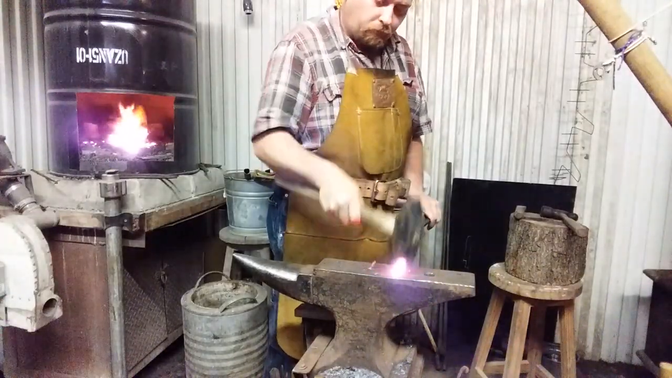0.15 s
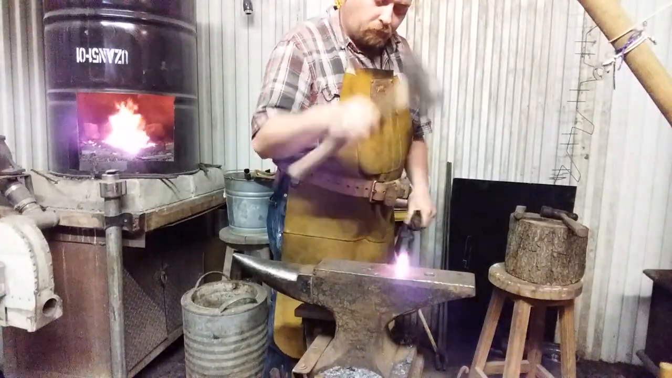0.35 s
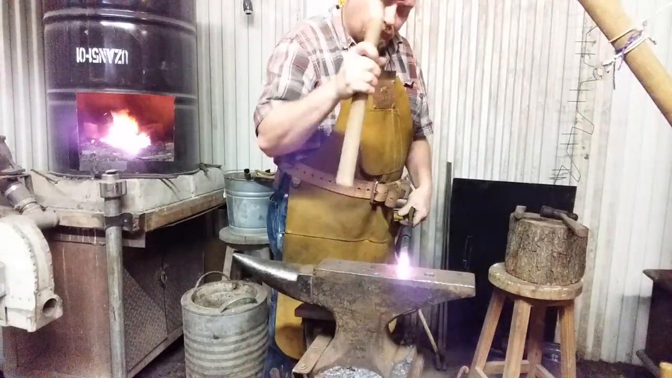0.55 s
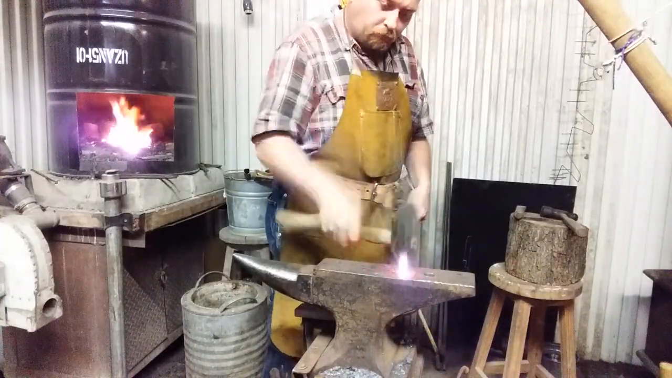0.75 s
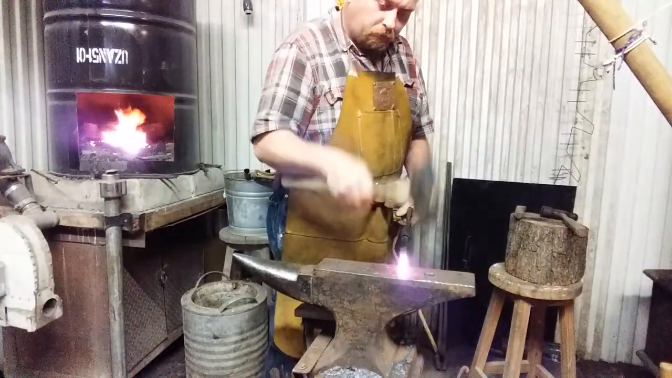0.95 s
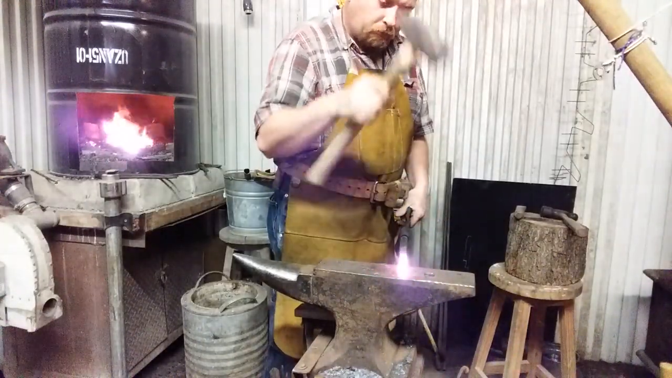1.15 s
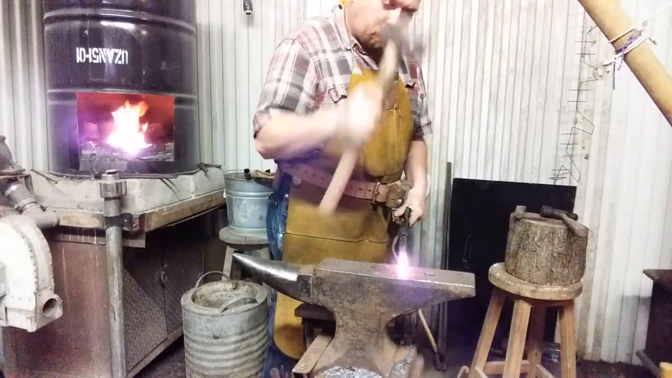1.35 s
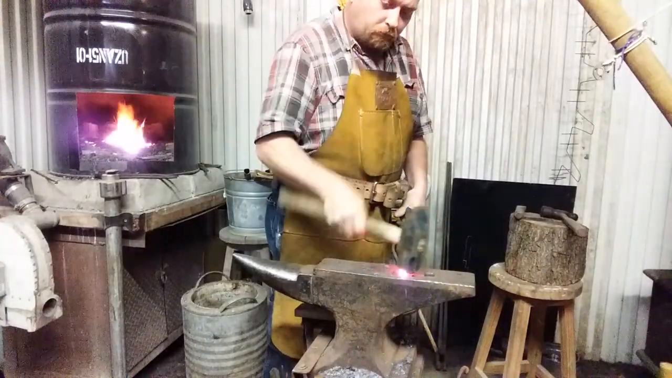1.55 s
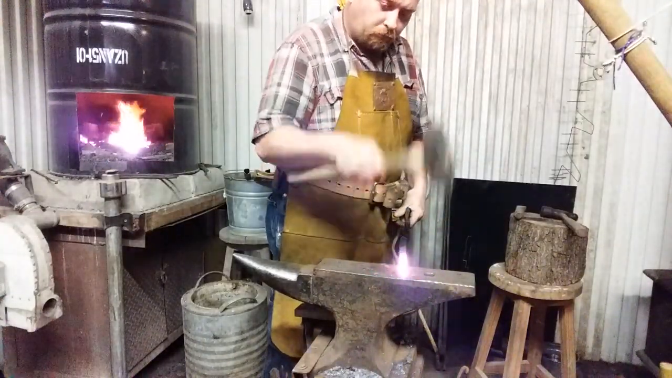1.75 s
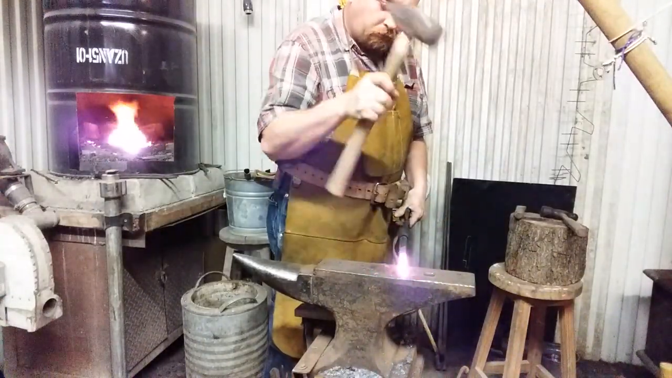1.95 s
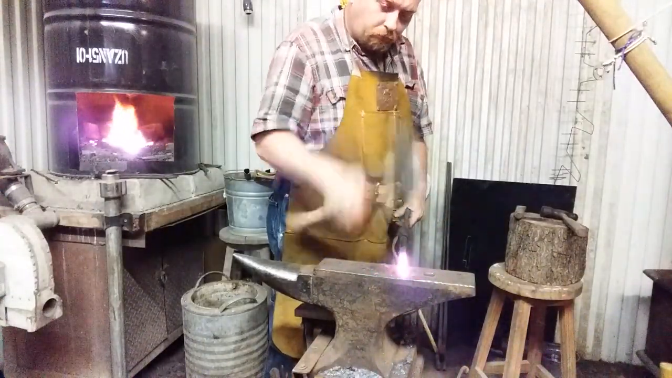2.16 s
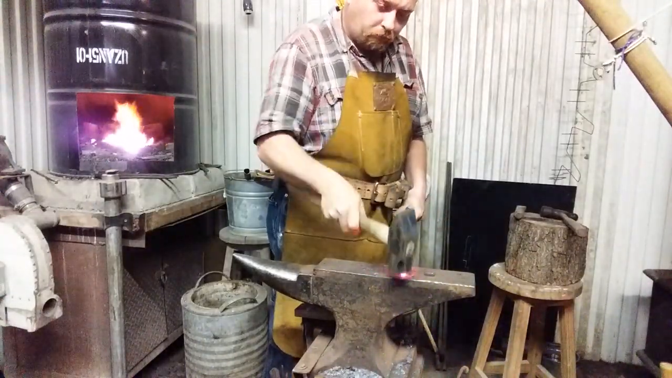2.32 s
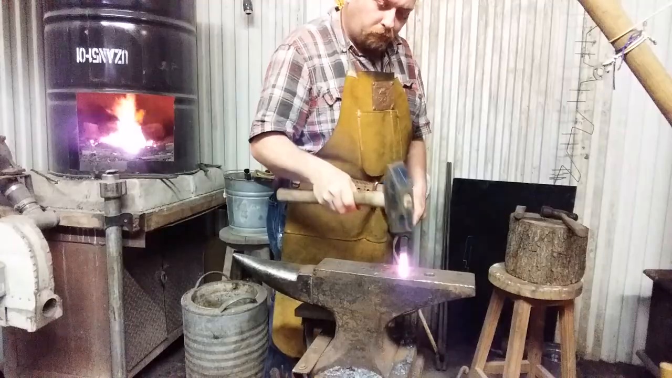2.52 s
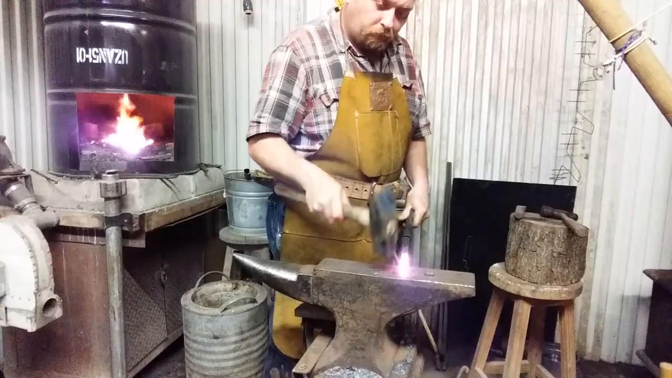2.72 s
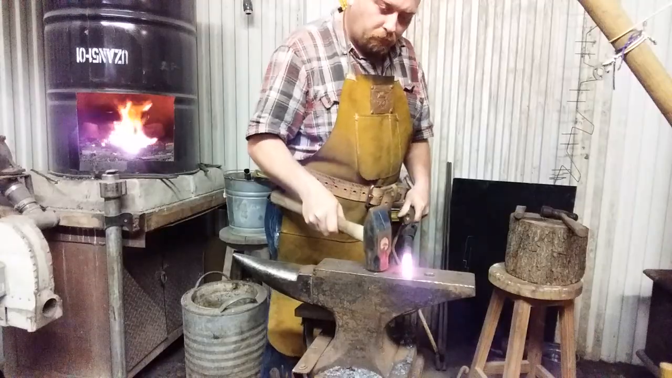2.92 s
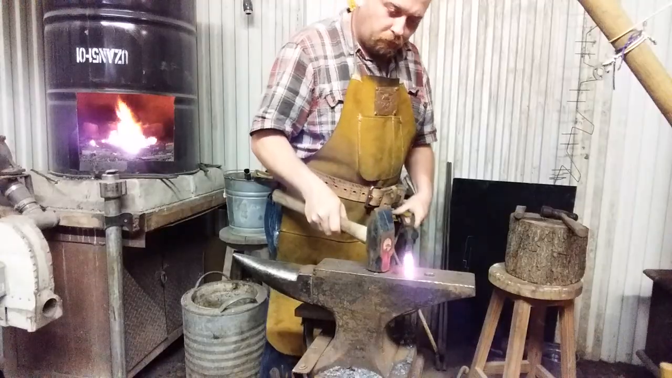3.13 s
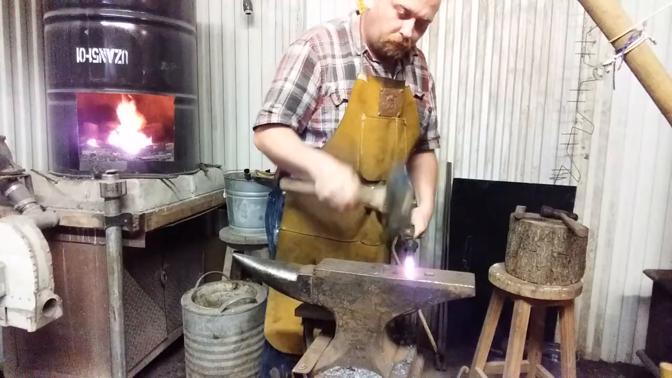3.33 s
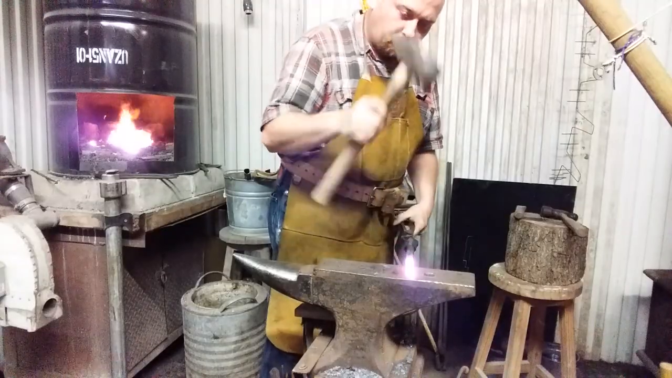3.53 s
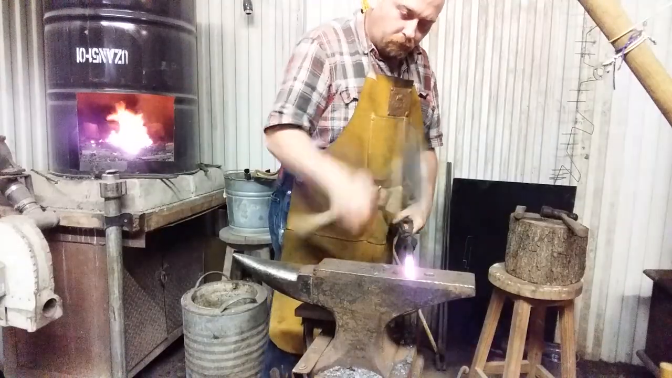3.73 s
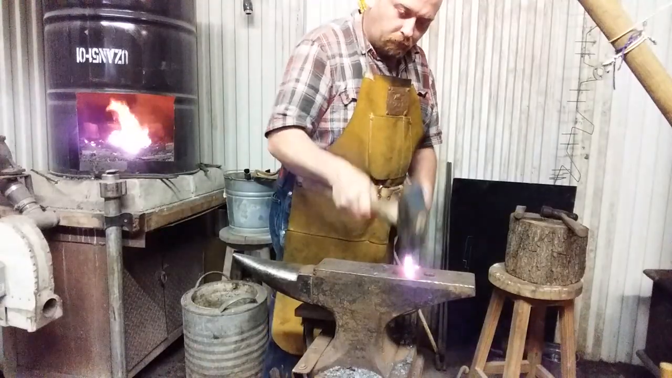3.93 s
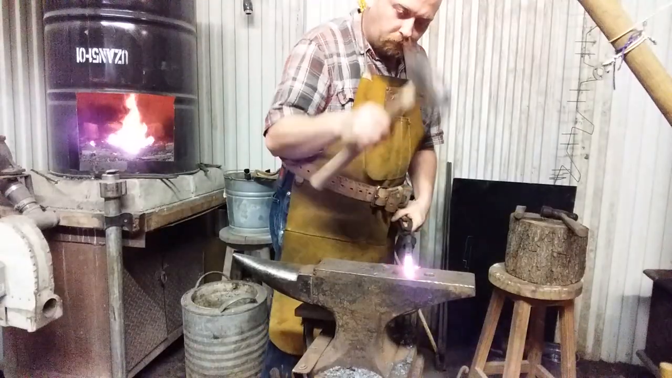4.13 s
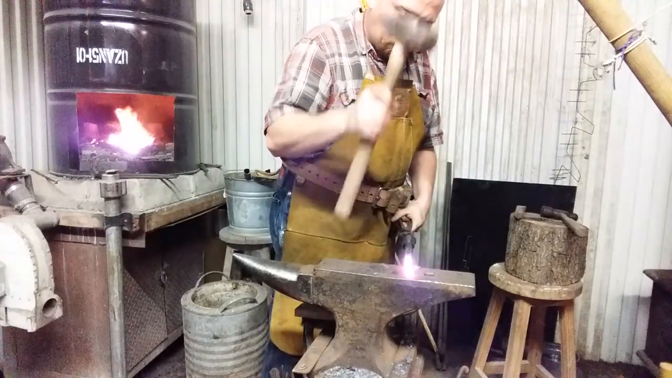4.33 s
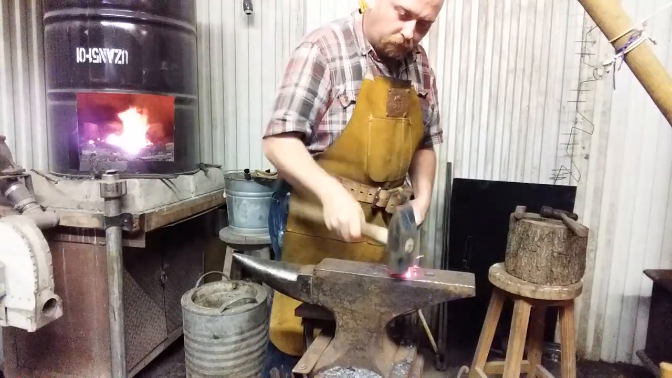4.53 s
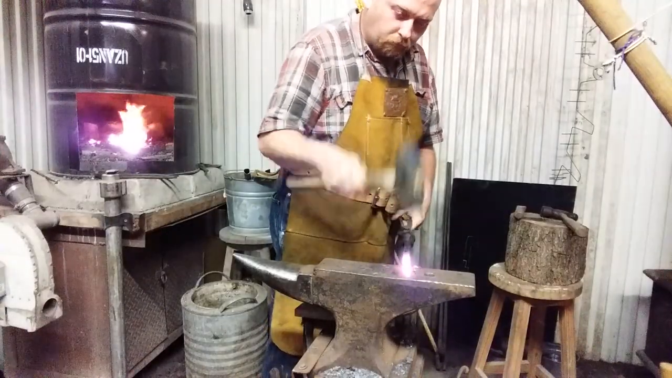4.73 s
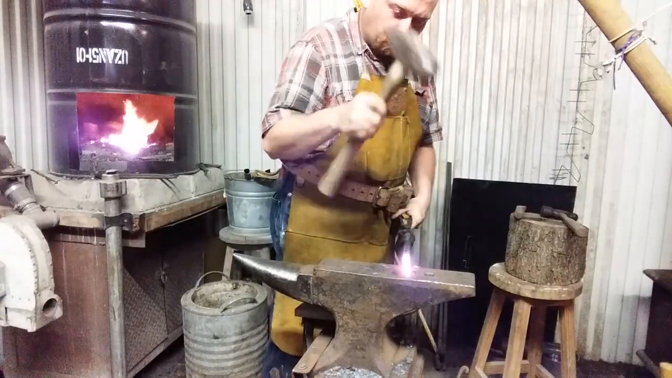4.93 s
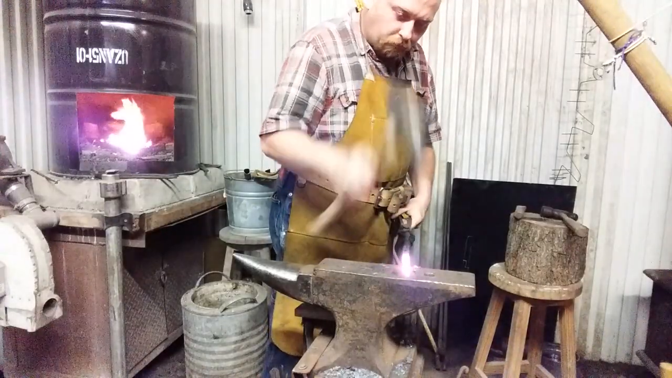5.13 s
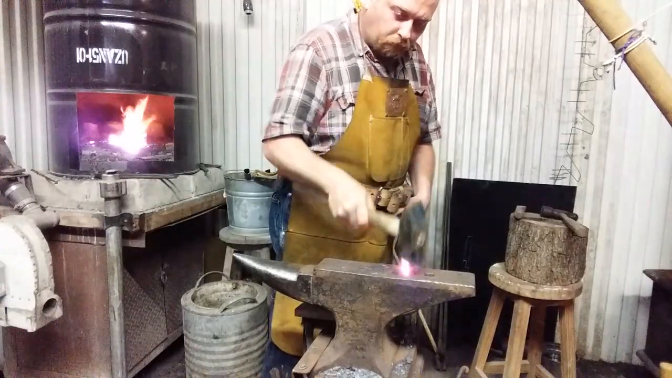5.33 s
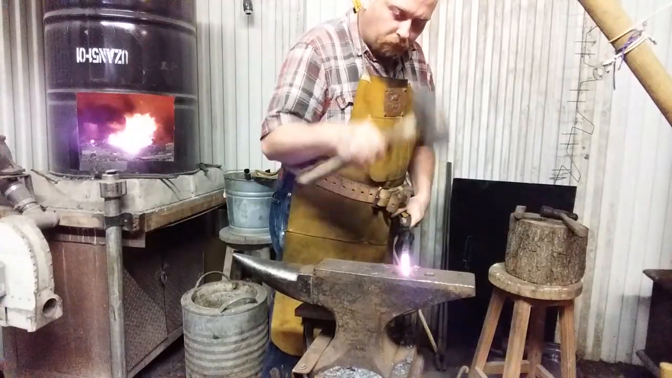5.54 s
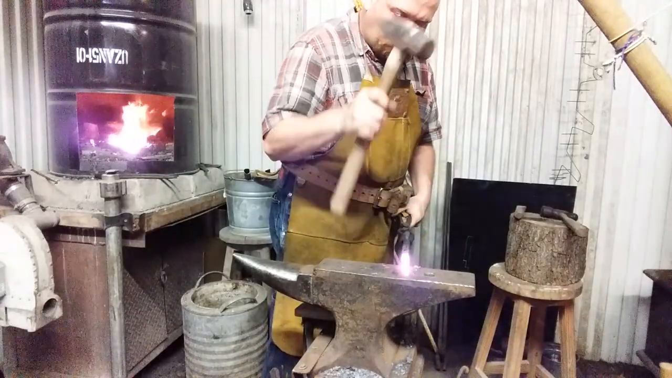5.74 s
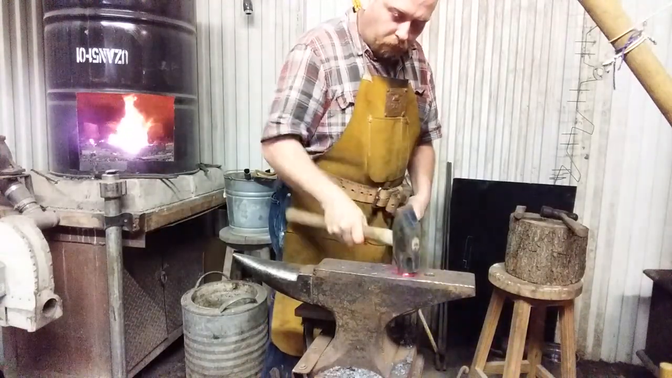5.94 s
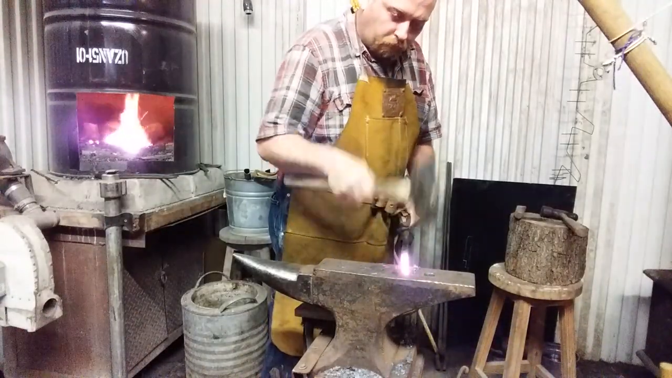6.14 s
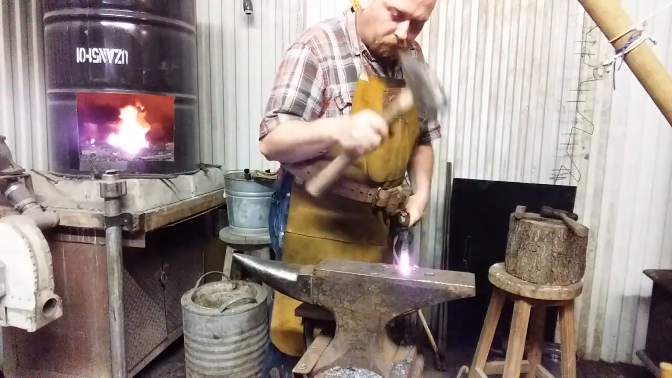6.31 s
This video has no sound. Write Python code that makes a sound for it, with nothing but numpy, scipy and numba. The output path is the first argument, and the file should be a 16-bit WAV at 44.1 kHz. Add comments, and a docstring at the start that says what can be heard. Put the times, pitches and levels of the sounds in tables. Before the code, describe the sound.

A hand hammer clanks on hot steel on an anvil in a steady rhythm, pausing once, over a low forge rumble.

```python
"""A hand hammer flattens hot steel on an anvil in a small sheet-walled forge.
Each impact excites damped modes of anvil, hammer and stand; the soft, glowing bar deadens them to
a clank that fills the shop. Halfway the smith lets the hammer drop and bounce to rest on the anvil.
The fire rumbles as broadband noise over the blower's hum, and an automatic gain control
ducks at the blows and creeps back."""
import sys
import numpy as np
from scipy import signal
from scipy.fft import rfft, irfft, next_fast_len
from scipy.io import wavfile
from scipy.ndimage import uniform_filter1d, minimum_filter1d
from numba import njit

SR = 44100
rng = np.random.default_rng(int(sys.argv[2]) if len(sys.argv) > 2 else 0)


def int16_out(signal):
    """Quantize to a 16-bit WAV file."""
    q = np.round(np.clip(np.atleast_2d(signal).T, -1, 1) * 32767)
    wavfile.write(sys.argv[1], SR, q.astype(np.int16))


N = 285327
RING = 2 * SR // 3  # samples that one blow lasts


def undb(db):
    """Amplitude ratio of a level in decibels."""
    return 10 ** (np.asarray(db) / 20)


def read(table, hz):
    """Interpolation of (frequency_hz, value) rows on a log-frequency axis."""
    frequencies, values = np.transpose(table)
    return np.interp(np.log(hz + 1e-3), np.log(frequencies), values)


def colour(x, table):
    """Minimum-phase filter with the response of (frequency_hz, gain_db) rows."""
    size = 2 * x.shape[-1]
    gain = undb(read(table, np.fft.rfftfreq(size, 1 / SR)))
    cepstrum = irfft(np.log(gain))
    cepstrum[1:size // 2] *= 2  # folding the cepstrum makes the filter causal
    cepstrum[size // 2 + 1:] = 0
    return irfft(rfft(x, size) * np.exp(rfft(cepstrum)))[..., :size // 2]


def bands(size, count, wide_hz):
    """Diffuse field as (centre_hz, width_hz, unit-rms noise); long waves reach both ears alike."""
    edges = np.geomspace(25, 17000, count + 1)
    hz = np.fft.rfftfreq(size, 1 / SR)
    mid, side = rfft(rng.standard_normal((2, size)))
    side = side * hz / np.hypot(hz, wide_hz)
    both = np.array([mid + side, mid - side])
    for lo, hi in zip(edges, edges[1:]):
        band = irfft(both * ((hz >= lo) & (hz < hi)), size)
        yield np.sqrt(lo * hi), hi - lo, band / band.std()


def walk(rate_hz):
    """Random modulation: steps smoothed twice and scaled to unit deviation."""
    span = int(SR / rate_hz)
    steps = np.repeat(rng.standard_normal(N // span + 1), span)
    smooth = uniform_filter1d(uniform_filter1d(steps, span), span)[:N]
    return smooth / smooth.std()


def fade(t60_s, hold_s=0.):
    """Exponential decay that sets in once the early reflections have passed."""
    t = np.arange(RING) / SR
    return np.exp(-np.log(1000) * (np.hypot(t, hold_s) - hold_s) / t60_s)


def add(out, start_s, sound):
    """Superposition of one impact on the mix."""
    start = int(start_s * SR)
    out[:, start:start + RING] += sound[:, :N - start]


def forge_fire(level_db=-38.5, swell_db=1.5, flutter_db=0.66):
    """Modulated broadband noise: the flames swell together and flutter band by band."""
    # noise spectrum of fire and blower: frequency_hz, relative_density_db
    spectrum = [(15, -62), (25, -31), (70, -5), (120, -3), (153, -6.5), (363, -4), (451, -11), (489, -4.5),
                (677, -10.5), (1940, -23.5), (3430, -35.5), (7310, -44), (10400, -53), (14000, -45.5),
                (16000, -61)]
    swell = swell_db * walk(1.6)
    fire = 0
    for hz, width, noise in bands(next_fast_len(N), count=36, wide_hz=600):
        flutter = flutter_db * walk(16) / np.hypot(1, hz / 2500)
        fire = fire + noise[:, :N] * np.sqrt(width) * undb(read(spectrum, hz) + swell + flutter)
    return undb(level_db) * fire / fire.std()


def blower(waver_db=3, drift=0.0014):
    """Tonal noise: a hum and a faint whine, randomly modulated in frequency and amplitude."""
    # blower tones: pitch_hz, level_db
    tones = [(119, -51.5), (360, -52), (425, -60.5), (7526, -90), (14002, -96)]
    hum = 0
    for hz, db in tones:
        cycles = np.cumsum(hz + (3 + drift * hz) * walk(40)) / SR
        hum = hum + undb(db + waver_db * walk(13)) * np.sqrt(2) * np.sin(2 * np.pi * cycles)
    return hum


def ring(hz, db, t60_s, wide_hz=600, build_s=.002, echo_s=0.02915, smear=0.48):
    """One damped mode in a room: interference with its echoes ripples its level and phase."""
    t = np.arange(RING) / SR
    ripple, shift = (np.interp(t / echo_s, np.arange(64), row) for row in rng.standard_normal((2, 64)))
    diffuse = smear * np.minimum(t / echo_s / 2, 2)
    # short waves reach the two ears out of step
    apart = np.array([[1], [-1]]) * rng.choice([-1, 1]) * np.pi / 4 * hz / np.hypot(hz, wide_hz)
    phase = 2 * np.pi * (hz * t + rng.random()) + diffuse * shift + apart
    swell = 1 - np.exp(-(t / (build_s + 1 / hz)) ** 2)  # a mode needs a cycle or more to build up
    return undb(db) * (1 + diffuse * ripple) * np.sin(phase) * fade(t60_s) * swell


def clack(pitches_hz=(1350, 2250), t60_s=.011, lag_s=.00006, upper_db=-5):
    """Contact transient of steel on steel: a few hard cycles that reach the left ear first."""
    t = np.maximum(np.arange(RING) / SR - np.array([[0], [lag_s]]), 0)
    lower, upper = (-np.sin(2 * np.pi * hz * t) for hz in pitches_hz)
    return (lower + undb(upper_db) * upper) * fade(t60_s)


def reverberation(hold_s=0.019, build_cycles=0.14):
    """Dense reflections form a diffuse field that decays band by band; the lows build up last."""
    # the shop's response to a blow: frequency_hz, relative_density_db
    spectrum = [(50, -30.5), (100, -14.5), (200, -4.5), (400, -1.5), (700, 1), (1100, -6.5), (1650, -0.5),
                (2150, -3.5), (2650, -3), (3600, -10), (5500, -15), (7500, -13), (9300, -19.5),
                (12000, -16.5), (16000, -21.5)]
    # reverberation time of the shop: frequency_hz, t60_s
    decay_times = [(100, 0.69), (260, 0.24), (700, 0.28), (1800, 0.27), (4800, .32), (13000, 0.26)]
    t = np.arange(RING) / SR
    out, power = 0, 0
    for hz, width, noise in bands(RING, count=26, wide_hz=690):
        envelope = fade(read(decay_times, hz), hold_s) * (1 - np.exp(-t * hz / build_cycles))
        tail = noise * envelope
        gain = undb(read(spectrum, hz)) * np.sqrt(width)
        out = out + gain * tail * envelope.std() / tail.std()
        power += gain ** 2
    return out / np.sqrt(power)


def cluster(lo_hz, hi_hz, db, t60_s, count):
    """Crowded modes between two frequencies beat against each other as they decay."""
    spots = (np.arange(count) + rng.random(count)) / count
    return sum(ring(lo_hz + (hi_hz - lo_hz) * spot, db, t60_s, build_s=0.024) for spot in spots)


def contact(start_s, force_db, soft_db, bedding_db=-7, bedding_s=0.86):
    """Contact time shapes the spectrum: a harder blow is shorter and brighter; soft metal thuds."""
    loose_db = bedding_db * np.exp(-start_s / bedding_s)  # duller until the bar lies flat on the face
    mid_db = 0.54 * soft_db
    clang_db = .5 * loose_db - 0.56 * soft_db
    bite_db = -0.6 + 0.29 * force_db + loose_db
    treble_db = -0.43 + 1.1 * force_db + soft_db + 0.38 * loose_db  # a soft spot also smacks
    return [(180, soft_db), (680, 2.5 + mid_db), (1050, mid_db), (1600, clang_db),
            (2200, bite_db), (4500, treble_db / 2), (12000, treble_db)]


def clink(levels_db=(-33, -28, -26, -28), t60_s=.25):
    """Short, bright modes whose excitation depends on how squarely the hammer lands."""
    # high steel modes: pitch_hz
    pitches = (9500, 10840, 10930, 12960)
    return sum(ring(hz, db, t60_s) for hz, db in zip(pitches, levels_db))


def ping(pair_hz=(10378, 10387), db=-33, t60_s=.47, second_db=-17):
    """Beating: two close, lightly damped steel modes throb gently as they die away."""
    # so narrow a ring fades almost evenly in the shop, hence the small smear
    first, second = (ring(hz, db, t60_s, build_s=0.024, smear=.12) for hz in pair_hz)
    return first + undb(second_db) * second


def hammer_blows(room_db=-4.5, knock_db=-10.5, steel_db=-10, clack_db=5, alike_hz=1900):
    """Impact excitation: every blow on the hot bar drives the same main modes and similar echoes."""
    # blows on the hot bar: start_s, force_db, softness_db, ping_db, clink_db
    blows = [(0.0425, .5, -2, 3.5, -11), (.7985, 1, -2, 7.5, -14), (1.5120, 1, -3, 1, 7),
             (2.2257, 1.5, -3, 12.5, 4), (3.7970, 1.5, 5, 7, 4.5), (4.522, -5.5, 6, 2.5, -22),
             (5.2371, 1, -1.5, -8, -17), (5.944, 1, -3, -3, -3)]
    # modes of the anvil's stand and the shop around it: pitch_hz, level_db, t60_s
    stand_modes = [(70.34, -21.5, .9), (111.2, -4.5, 0.21), (181, -12, 0.086), (196.9, 1.5, 0.17),
                   (212.3, 9, 0.07), (232, -1, 0.24), (278.7, -9, 0.38), (300.3, -15.5, 0.49),
                   (349.3, -2, 0.21), (380.7, 0, 0.14), (404.4, 6.5, 0.15), (437, -11.5, 0.23),
                   (430, -4.5, 0.21), (549, -9.5, 0.33), (575, 0, 0.21), (625, 0.5, 0.22), (640, 4, 0.18),
                   (669.6, -6.5, 0.31), (813, -11, 0.37), (790, -14.5, 0.32), (875, 3, 0.15),
                   (983, -17.5, 0.18), (1080, -5.5, .27), (1173, -7.5, .3)]
    # modes of anvil and hammer head: pitch_hz, level_db, t60_s
    steel_modes = [(1284, -8, .28), (1370, -16, 0.14), (1594, -14.5, 0.37), (1523, -0.5, 0.059),
                   (1670, -6, 0.27), (1660, -2.5, 0.25), (1688, -12.5, 0.23), (1664, -6, 0.1),
                   (1790, -2, 0.15), (1950, -12.5, 0.36), (2550, -13.5, .24), (2866, -10, .25),
                   (4850, -15.5, 0.25)]
    out = np.zeros((2, N))
    knock = sum(ring(*mode) for mode in stand_modes)
    steel = sum(ring(*mode) for mode in steel_modes)
    body = undb(knock_db) * knock + undb(steel_db) * steel + undb(clack_db) * clack()
    common_echoes = rfft(reverberation(), 2 * RING)
    # the treble of the echoes changes most with the spot that is hit
    blend = np.arctan(.5 + (np.fft.rfftfreq(2 * RING, 1 / SR) / alike_hz) ** 2)
    for start_s, force_db, soft_db, ping_db, clink_db in blows:
        fresh_echoes = rfft(reverberation(), 2 * RING)
        shop = irfft(common_echoes * np.cos(blend) + fresh_echoes * np.sin(blend))[:, :RING]
        clang = cluster(1540, 1790, db=-23, t60_s=.34, count=12)
        overtones = cluster(2200, 5200, db=-25.5, t60_s=.27, count=8)  # damped by the soft bar
        overtones += cluster(5500, 14000, db=-35, t60_s=.27, count=12)
        response = body + clang + overtones + undb(room_db) * shop
        clank = colour(response, contact(start_s, force_db, soft_db))
        high_rings = undb(clink_db) * clink() + undb(ping_db) * ping()
        add(out, start_s, undb(force_db) * (clank + high_rings))
    return out


def bounces(drop_s=2.8607, first_flight_s=.1067, restitution=.433):
    """Inelastic rebound: each landing of the dropped hammer comes sooner, weaker and duller."""
    for k in range(3):
        start_s = drop_s + first_flight_s * (1 - restitution ** k) / (1 - restitution)
        force_db, treble_db = -9 - 6 * k, -12.5 - 8 * k
        yield start_s, force_db, treble_db


def anvil_taps(room_db=-6, modes_db=-14, touch_treble_db=-6.5):
    """Free vibration of the hammer head on the anvil face under light touches and as it drops and bounces."""
    # modes of the hammer head lying on the anvil face: pitch_hz, level_db, t60_s
    head_modes = [(321.4, -5, 0.36), (421.4, -6, 0.41), (930, -5, 0.35), (1156, -10, 0.22), (1880, 9, 0.11),
                  (1953, 4, 0.27), (2110, -0.5, 0.24), (2390, -6, 0.3), (2950, -7, .25), (3950, -0.5, .25),
                  (4030, -7, 0.34), (4090, -10, 0.37), (5800, -20.5, 0.43), (6780, -12, 0.3),
                  (10360, -34, 0.41)]
    # light touches of steel between blows: start_s, force_db
    touches = [(2.799, -50.5), (3.208, -43), (3.543, -45.5), (5.7986, -45)]
    out = np.zeros((2, N))
    body = undb(modes_db) * sum(ring(*mode) for mode in head_modes) + clack()
    taps = list(bounces()) + [(*touch, touch_treble_db) for touch in touches]
    for start_s, force_db, treble_db in taps:
        spectrum = [(140, -10), (320, 5.5), (600, 1.1), (2200, 0.5),
                    (4800, treble_db / 2), (8000, treble_db + 4), (12000, treble_db)]
        shop = reverberation(hold_s=0.0017)  # a tap is over at once, so its echoes fall straight away
        add(out, start_s, undb(force_db) * colour(body + undb(room_db) * shop, spectrum))
    return out


@njit
def follow(x, attack_s, release_s):
    """Envelope follower: a first-order lag with separate rise and fall times."""
    out, level = np.empty(len(x)), 0.
    up, down = 1 - np.exp(-1 / (attack_s * SR)), 1 - np.exp(-1 / (release_s * SR))
    for i in range(len(x)):
        level += (x[i] - level) * (up if x[i] > level else down)
        out[i] = level
    return out


def gain_control(x, knee_db=-11, slope=0.6, attack_s=0.026, hold_s=1.05, recover_s=0.19):
    """Compression: the gain drops to suit the loudest recent blow, holds, then creeps back."""
    loudness = follow(np.abs(x).max(axis=0), 0.006, 0.019)
    loudness[0] = 1  # the hammering is already under way
    half = int(hold_s * SR / 2)
    held = -minimum_filter1d(-loudness, size=2 * half + 1, origin=half, mode="nearest")
    settled = follow(held - held[0], attack_s, recover_s) + held[0]
    return x * np.minimum(1, undb(knee_db) / (settled + 1e-9)) ** slope


def scene(anvil_pan_db=-0.5, forge_pan_db=-0.85):
    """Interaural level difference sets anvil and forge a little to the right."""
    sides = np.array([[.5], [-.5]])
    anvil = hammer_blows() + anvil_taps()
    forge = forge_fire() + blower()
    return anvil * undb(anvil_pan_db * sides) + forge * undb(forge_pan_db * sides)


def record(dry, low_cut_hz=48, top_hz=15800, ceiling_db=-1.0, release_s=0.011):
    """Band and peak limiting: bass cut, slow gain control, fast look-ahead limiter, top cut."""
    high_pass = signal.butter(3, low_cut_hz, "high", fs=SR, output="sos")
    low_pass = signal.ellip(10, .1, 80, top_hz, fs=SR, output="sos")
    compressed = gain_control(signal.sosfilt(high_pass, dry))
    peak = follow(np.abs(compressed).max(axis=0), 1e-6, release_s)
    gain = np.minimum(1, undb(ceiling_db) / (peak + 1e-9))
    gain = uniform_filter1d(minimum_filter1d(gain, size=41), size=41)  # dips just ahead of each peak
    return signal.sosfilt(low_pass, compressed * gain)


dry = scene()
out = record(dry)
int16_out(out)
```